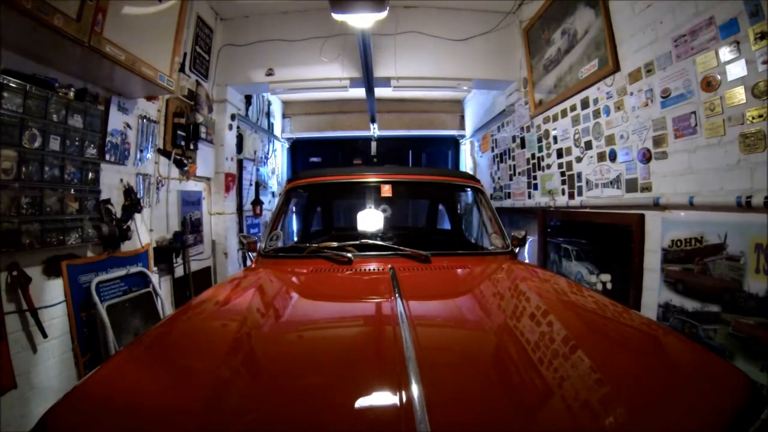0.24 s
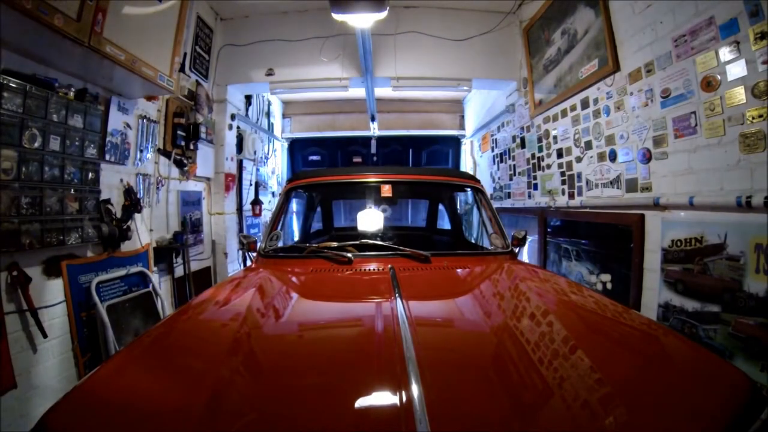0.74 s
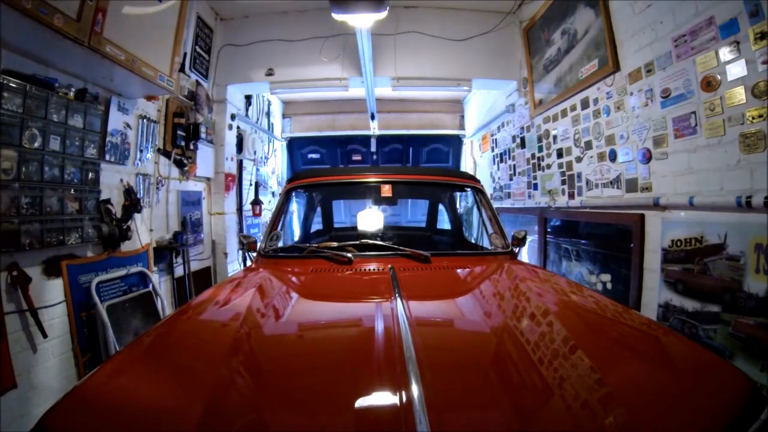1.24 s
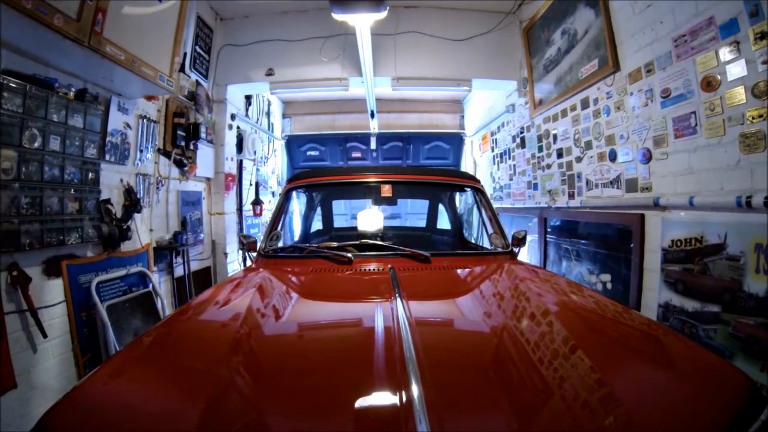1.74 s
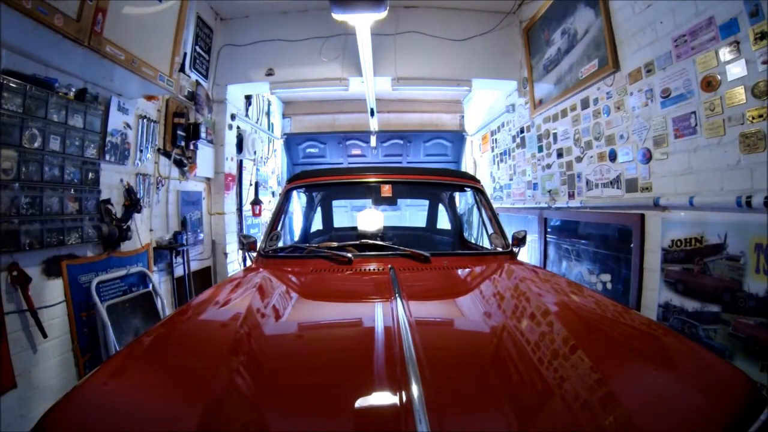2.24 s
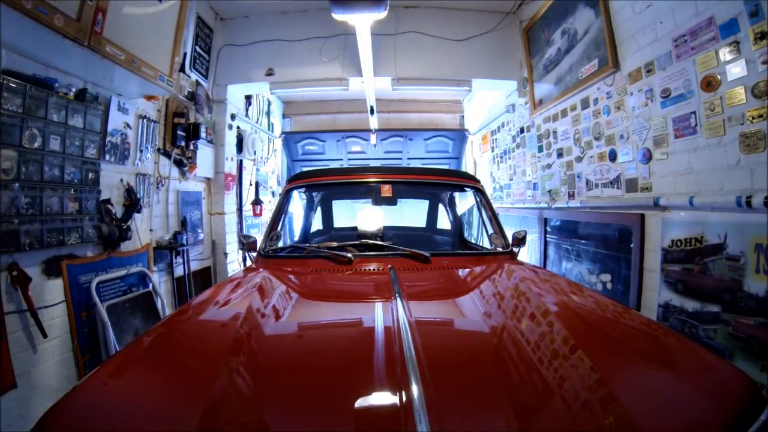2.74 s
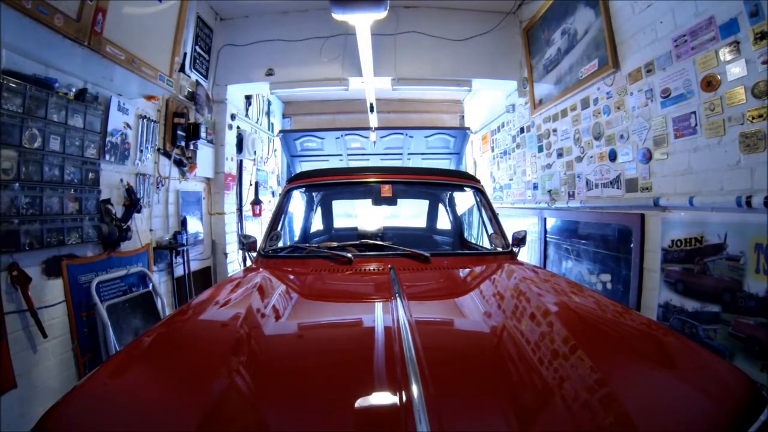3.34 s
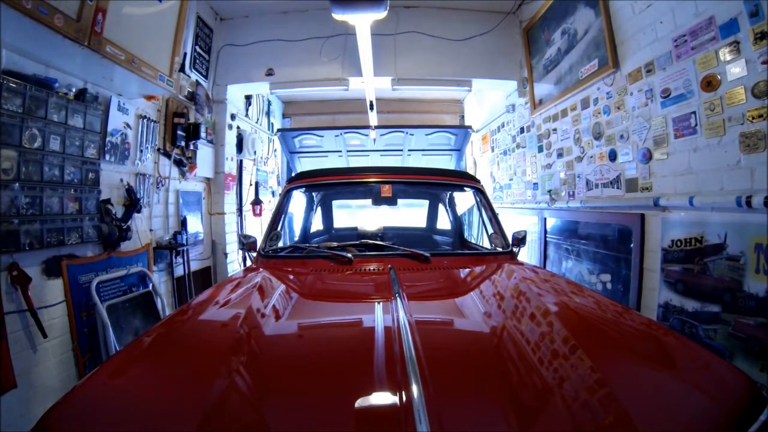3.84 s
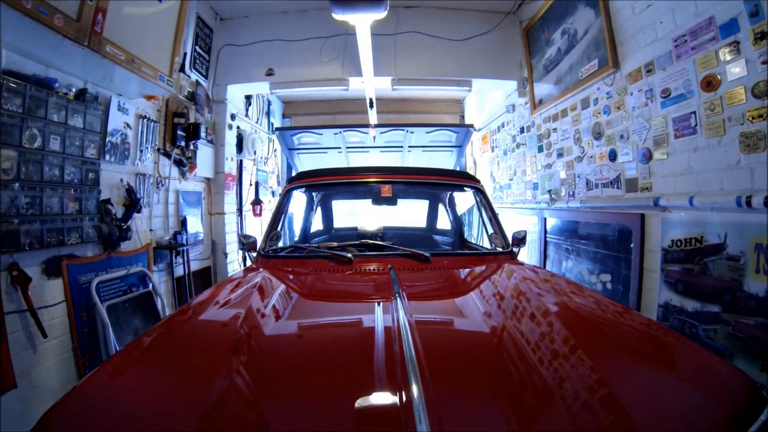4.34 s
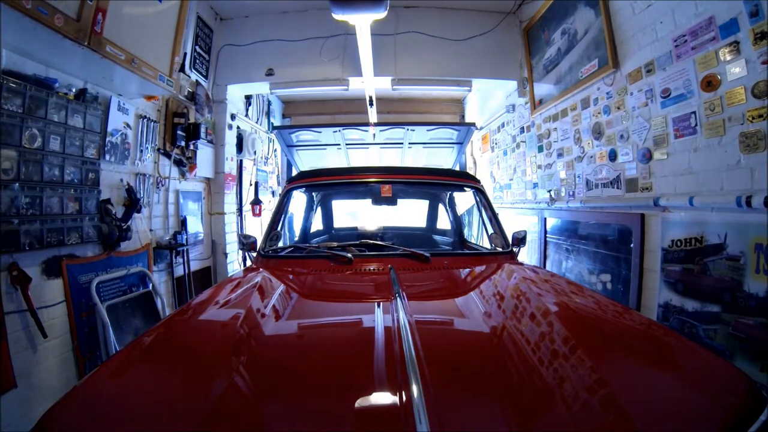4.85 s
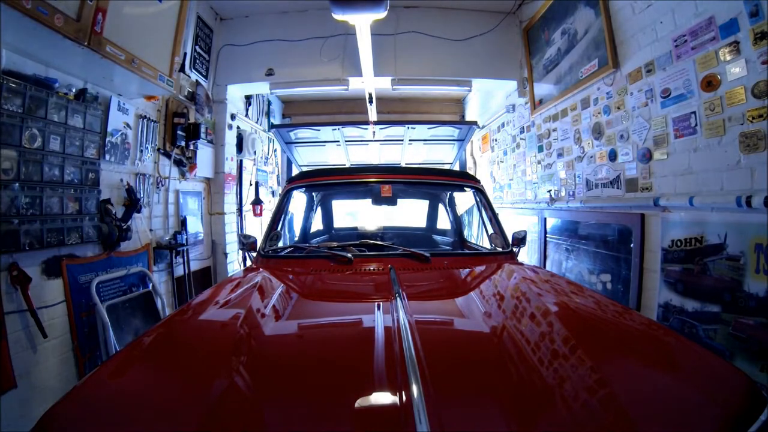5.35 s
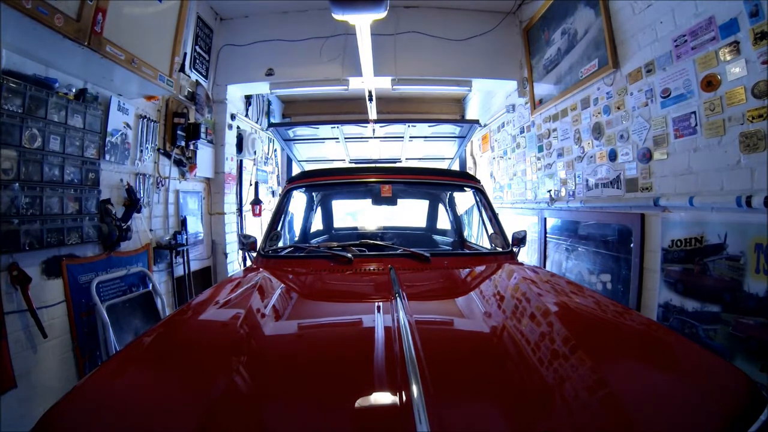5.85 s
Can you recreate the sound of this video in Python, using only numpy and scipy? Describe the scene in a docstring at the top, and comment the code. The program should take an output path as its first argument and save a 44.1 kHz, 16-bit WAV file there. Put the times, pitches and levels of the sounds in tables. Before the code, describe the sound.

An electric garage door opener runs with a steady low hum, a gear whine and a rattling drive. Early on, the steel door clicks and clanks several times as it pulls free, with a low rumble and a short rising squeak. The rollers then hiss and scrape lightly in their tracks, and the motor grows a little louder toward the end. It is heard from inside a narrow garage with a short echo.

```python
"""A narrow brick garage, where an electric opener lifts a steel up-and-over door.
The motor's core hums at twice the mains rate and its meshing gears whine. Dense small impacts excite
resonances: the drive rattles along its rail, and the rollers hiss and scrape in their tracks.
The door clicks and clanks as it leaves the frame, a dry pivot squeaks, and the panel rumbles and
booms in its low modes on the way up. Reflections from the close walls prolong the knocks and squeaks."""
import sys
import numpy as np
from scipy import signal
from scipy.fft import rfft, irfft
from scipy.io import wavfile
from scipy.ndimage import uniform_filter1d

SR = 44100
rng = np.random.default_rng(int(sys.argv[2]) if len(sys.argv) > 2 else 0)


def dump(signal):
    """Clip the signal to [-1, 1] and save it as 16-bit WAV at the path in sys.argv[1]."""
    limited = np.clip(np.atleast_2d(signal).T, -1, 1)
    pcm = np.round(limited * 32767).astype(np.int16)
    wavfile.write(sys.argv[1], SR, pcm)


N = 268128
HUM_HZ, SHAFT_HZ, BEATS_PER_TURN = 99.7, 19.8, 5

# faint steady hiss: frequency_hz, density_db
BACKGROUND_SPECTRUM = [(2000, -10), (3100, 7.5), (5200, -10.5), (5800, -9.5), (7300, -14.5), (8800, -9.5),
                       (11000, -17), (12200, -27), (13500, -32), (15000, -34)]
# reverberation time of the garage: frequency_hz, t60_s
GARAGE_DECAY = [(200, 0.34), (1000, 0.47), (3500, 0.38), (8000, 0.29), (15000, 0.22)]

# pace of the door as a level of roller hiss; it slows near 2.7 s, then runs freely: time_s, level_db
DOOR_PACE = [(0.0, -57.5), (0.78, -48.5), (1.0, -55.5), (1.5, -49.5), (1.62, -59.5), (1.88, -52),
             (2.2, -58), (2.47, -55), (2.72, -59.5), (2.98, -56.5), (3.3, -52), (3.7, -47), (4.85, -45.5),
             (5.35, -45), (6.08, -45)]
# hiss of the rollers: frequency_hz, density_db
ROLLER_SPECTRUM = [(710, -42), (1200, -23), (1350, -5), (1480, -10), (1830, 1.5), (2290, -7.5),
                   (2440, -4.5), (2620, -10), (2820, -10), (5210, -21), (5790, -25.5), (7470, -39.5),
                   (11000, -43), (13500, -60), (15000, -57)]
# resonances of the steel tracks: frequency_hz, gain_db
TRACK_MODES = [(2410, 0), (2770, -2), (2890, 0), (3120, -3), (3500, -3), (3790, -3), (3920, -4), (4135, -3),
               (4305, -6), (4540, -5), (4890, -7), (5105, -7)]
# a roller scrapes in its track: start_s, length_s, level_db
SCRAPES = [(0.274, 0.17, -36.5), (2.434, 0.11, -36.5), (2.895, 0.066, -40), (3.02, 0.13, -36.5),
           (3.623, 0.17, -39), (5.213, 0.067, -39), (5.604, .08, -33)]
# colour of a scrape: frequency_hz, density_db
SCRAPE_SPECTRUM = [(400, -28), (600, 10), (1300, 0.5), (2100, -1.5), (3000, -19), (5000, -34), (8000, -58)]
# spells in which the rollers set the panel whirring: time_s, level_db
WHIRR_LEVELS = [(0.0, -52), (0.7, -46), (1.0, -49), (1.7, -45.5), (2.2, -50.5), (2.44, -44.5), (2.54, -47),
                (2.62, -52), (2.95, -51.5), (3.13, -46.5), (3.5, -44.5), (3.8, -42.5), (4.2, -42),
                (4.36, -40), (4.6, -43.5), (5.1, -42.5), (5.5, -40.5), (6.08, -42)]
# panel resonances that whirr: frequency_hz, width_hz, gain_db
WHIRR_MODES = [(800, 9.4, -8.5), (841, 5.3, 5.5), (896.6, 7.3, 3), (937, 12, -3.5), (1006.6, 12, -2.5)]

# fine buzz of the gear teeth: frequency_hz, density_db
TOOTH_SPECTRUM = [(1400, -25), (1850, 2), (2300, -3), (2900, 0), (3800, -2.5), (5200, -10), (5900, -24),
                  (8000, -42), (11000, -60)]
# whine of the gears as they take the strain: time_s, level_db
WHINE_LEVELS = [(0.0, -57.5), (0.7, -42.5), (1.02, -55), (1.45, -48), (1.9, -50), (2.2, -63), (2.42, -48),
                (2.8, -55), (3.1, -51), (3.45, -43), (4.15, -51), (4.4, -48), (4.9, -44.5), (5.3, -46),
                (6.08, -44.5)]
# gear tones, relative to the whine's peak and its swing: pitch_hz, gain_db, swing_share
GEAR_TONES = [(355, -6, 0.3), (563, -5, 0.24), (764, -21, .1), (808, -5, 1.4), (851, -3, 0.72),
              (933, -4.5, 1.6), (971, -6, 1), (1020.4, -2, 1.25), (1760, -13.5, 1), (1864, -12, 1.07),
              (1980, -16, 0.79)]
# the drive's pull, as rattle added to what the pace gives: time_s, gain_db
DRIVE_PULL = [(0.0, -0.5), (0.8, -2.5), (1.35, -2), (2.0, -3), (2.7, -4), (3.3, -3.5), (3.8, -4), (4.4, -3),
              (4.9, -4.5), (5.35, -1), (6.08, -3.5)]
# resonances of the rail and motor housing: frequency_hz, width_hz, gain_db
RAIL_MODES = [(357.4, 5.1, 5), (392.5, 25.5, -2.5), (454.5, 30, -6.5), (530, 9.6, 1.5), (556.7, 13.3, -1.5),
              (617, 38, -4), (676, 40, -5.5), (779, 27, 0.5), (807, 24.5, -2), (872, 32, -0.5),
              (884.4, 13, 5), (979, 21.4, -0.5), (1028.6, 9.8, 0), (1083.5, 16.4, -2), (1232, 25, -8.5),
              (1316, 10.4, -6), (1614, 10, -8), (1753, 15, -9.5), (1883, 23, -13), (1982, 37, -16),
              (2142, 99, -16)]
# clatter of the drive links: frequency_hz, density_db
CLATTER_SPECTRUM = [(200, -35), (310, -56), (370, 5), (440, -4), (600, 6), (730, -1.5), (850, -5),
                    (1050, -3.5), (1170, -2.5), (1450, -5.5), (2100, -18), (2350, -26), (4000, -34)]
# the hum, rising with the load on the motor: time_s, fundamental_db, octave_db
HUM_LEVELS = [(0.05, -39, -54), (0.23, -41, -57), (0.26, -39, -48), (0.79, -31, -44), (1.08, -37, -53),
              (1.14, -34, -44), (1.18, -35, -55), (1.21, -37, -45), (1.34, -29, -45), (1.61, -36, -48),
              (2.57, -33, -49), (2.83, -34, -54), (2.95, -34, -48), (3.71, -31, -41), (4.27, -28, -43),
              (4.94, -30, -43), (5.2, -25, -44), (6.0, -27, -45)]
# drone of the housing on two harmonics of the hum: time_s, fourth_db, fifth_db
DRONE_LEVELS = [(0.0, -48.5, -54.5), (1.6, -46, -53.5), (2.3, -47.5, -70), (2.9, -49.5, -55),
                (3.25, -53, -50), (3.68, -44, -60), (3.8, -59, -43), (4.3, -52, -49), (4.9, -47, -53.5),
                (5.4, -48, -47.5), (6.08, -43, -46)]
# harmonics of the motor's buzz: harmonic_number, gain_db
BUZZ_HARMONICS = [(3, -34.5), (6, -14), (7, -7), (9, -6.5)]

# a dry pivot squeaks: start_s, pitch_hz, echo_level_db
SQUEAKS = [(.797, 2950, -58), (1.011, 3000, -58), (1.478, 2963, -42), (1.654, 2930, -57),
           (3.745, 9450, -75.5)]
# inharmonic partials of a squeak: pitch_ratio, gain_db
SQUEAK_PARTIALS = [(1, 0), (1.115, -5), (1.41, -11)]
# knocks of the linkage and rollers: start_s, clang_db, ring_db, clack_db, tick_db, cutoff_hz
KNOCKS = [(.732, -33, -51, -46.5, -46, 15000), (0.792, -37, -46, -43, -68, 8000),
          (.831, -29, -50, -34, -40, 13300), (1.064, -38, -44, -51, -72, 8000),
          (1.084, -24, -19, -32.5, -47, 16000), (1.112, -33, -31, -42, -64, 12000),
          (1.137, -44, -20, -55, -75, 1210), (1.273, -49, -60, -61, -59, 15000),
          (1.400, -32, -46, -48, -51.5, 16000), (1.479, -32.5, -39, -42, -51, 8500),
          (1.617, -42, -47, -59, -57.5, 15000), (1.653, -39, -46, -49, -72, 8000),
          (1.899, -38, -48, -52.5, -59.5, 10100), (2.897, -40, -47, -57, -80, 4000),
          (3.033, -40, -42, -55, -80, 4000), (3.624, -34.5, -46, -54, -78, 4000)]
# ringing modes of the door: frequency_hz, gain_db, t60_s
DOOR_MODES = [(533, -9, .25), (790, -11, .16), (945, -5, .16), (980, -3, .13), (1003, 2, .15),
              (1028, -3, .15), (1130, -11, .14), (1265, -10, .17), (1400, -13, .14), (1545, -9, .17),
              (1620, -16, .33), (1730, -13.5, .28), (1875, -16, .18), (2058, -13.5, .42)]
# ringing modes of the steel linkage: frequency_hz, gain_db, t60_s
LINKAGE_MODES = [(2842, -3, .25), (3138, -5, .29), (3214, 0, .2), (3375, -3, .23), (3784, -6, .27),
                 (4177, -8, .2), (5448, -12, .12)]
# the panel's clang in a knock: frequency_hz, density_db
CLANG_SPECTRUM = [(150, -3), (450, -17.5), (750, -4.5), (1000, -4.5), (1400, -11), (2100, -16), (3000, -28)]
# the metal clack in a knock: frequency_hz, density_db
CLACK_SPECTRUM = [(1200, -45), (2050, 6.5), (2450, 3.5), (3250, 8), (3650, 3.5), (4200, -1), (5300, -6),
                  (6600, -43), (9000, -38)]
# the bright tick in a knock: frequency_hz, density_db
TICK_SPECTRUM = [(4000, 9.5), (6000, 5), (7500, -3), (8700, 2), (11400, -2), (12300, -4), (14200, -7),
                 (15500, -14)]

# sway of the panel, greatest as it breaks free of the frame: time_s, level_db
SWAY_LEVELS = [(0.0, -29), (0.55, -26.5), (1.15, -22), (1.32, -15.5), (1.7, -29.5), (1.95, -30.5),
               (2.4, -35.5), (2.7, -38), (3.15, -33), (3.5, -35), (4.2, -32), (5.0, -35.5), (6.08, -37.5)]
# slow flexing of the panel: frequency_hz, density_db
FLEX_SPECTRUM = [(8, -27), (13, 14.5), (24, 6), (37, 5.5), (52, -0.5), (70, -2.5), (90, -18.5),
                 (125, -11.5), (170, -38)]
# drumming of the panel: frequency_hz, density_db
DRUMMING_SPECTRUM = [(80, 5), (125, 3), (170, 0), (225, -10), (270, -4.5), (330, -3), (500, -6.5)]
# jolts of the panel: start_s, boom_db, drumming_db
BUMPS = [(0.294, -24, -35), (0.879, -17, -35), (1.088, -37, -31.5), (1.255, -32, -49), (1.411, -20, -44),
         (1.892, -26.5, -33), (2.058, -24.5, -41), (3.606, -15.5, -58), (4.112, -22.5, -61),
         (4.164, -20.5, -58)]
# lowest modes of the panel: frequency_hz, gain_db, t60_s
BOOM_MODES = [(34, 1, 0.51), (65.6, 0, 0.13)]


def from_db(db):
    """Amplitude ratio of a level in decibels."""
    return 10 ** (np.asarray(db) / 20)


def unit_power(x):
    """Normalisation to an RMS of one."""
    return x / np.sqrt(np.mean(x ** 2) + 1e-20)


def in_time(rows):
    """Linear interpolation in time: one curve per column."""
    times, *columns = np.transpose(rows)
    return [np.interp(np.arange(N) / SR, times, column) for column in columns]


def at_hz(points, hz):
    """Interpolation on a logarithmic frequency axis."""
    frequencies, values = np.transpose(points)
    return np.interp(np.log(np.maximum(hz, 1)), np.log(frequencies), values)


def coloured(x, spectrum):
    """Spectral shaping to unit power, falling 12 dB per octave beyond the table's ends."""
    hz = np.maximum(np.fft.rfftfreq(len(x), 1 / SR), 1)
    skirts = np.minimum(hz / spectrum[0][0], 1) ** 2 * np.minimum(spectrum[-1][0] / hz, 1) ** 2
    return unit_power(irfft(rfft(x) * from_db(at_hz(spectrum, hz)) * skirts, len(x)))


def noise(spectrum):
    """Gaussian noise with a given spectral shape."""
    return coloured(rng.standard_normal(N), spectrum)


def drift(rate_hz):
    """Random fluctuation: low-passed noise of unit power."""
    hz = np.fft.rfftfreq(N, 1 / SR)
    return unit_power(irfft(rfft(rng.standard_normal(N)) / (1 + (hz / rate_hz) ** 2), N))


def tone(hz):
    """A sinusoid of unit power whose phase is the integral of its frequency."""
    return np.sqrt(2) * np.sin(2 * np.pi * (np.cumsum(hz) / SR + rng.random()))


def resonance(x, hz, width_hz):
    """Forced response of a damped oscillator with a peak gain of one."""
    r = np.exp(-np.pi * width_hz / SR)
    feedback = [1, -2 * r * np.cos(2 * np.pi * hz / SR), r * r]
    return signal.lfilter(np.array([1, 0, -1]) * (1 - r * r) / 2, feedback, x)


def struck(modes, t):
    """Free vibration: modes decay exponentially, with new strengths and phases at each blow."""
    return sum(from_db(db + rng.normal(0, 1) - 60 * t / t60) * np.sin(2 * np.pi * (hz * t + rng.random()))
               for hz, db, t60 in modes)


def onset(t, rise_s):
    """Exponential approach to full amplitude."""
    return 1 - np.exp(-t / rise_s)


def contacts(per_s, spread_db, throb, throb_hz):
    """Shot noise: tiny random impacts, modulated by the machine that shakes them."""
    sizes = from_db(spread_db * np.minimum(rng.exponential(1, N), 4)) * rng.standard_normal(N)
    shake = 1 + throb * np.sin(2 * np.pi * throb_hz * np.arange(N) / SR)
    return sizes * shake * (rng.random(N) < per_s / SR)


def add(out, start_s, sound):
    """Superposition of a sound from its start time."""
    at = round(start_s * SR)
    out[at:at + len(sound)] += sound[:N - at]


def reflected(x, t60_s):
    """Interference: dense echoes from close walls give a sound fine, stationary spectral peaks."""
    t = np.arange(SR // 4) / SR
    return signal.fftconvolve(x, rng.standard_normal(len(t)) * from_db(-60 * t / t60_s))[:N]


def garage_response(spectrum, build_s=0.0008, direct=9):
    """Impulse response: a direct snap at 2 ms amid reflections that build, then die soonest in the treble."""
    t = np.arange(SR // 2) / SR
    arrivals = rng.standard_normal(len(t))
    arrivals[round(0.002 * SR)] += direct
    bins, hz = rfft(coloured(arrivals, spectrum)), np.fft.rfftfreq(len(t), 1 / SR)
    tail = np.zeros(len(t))
    for low_hz in 44 * 2. ** np.arange(10):
        octave = irfft(bins * (hz >= low_hz) * (hz < 2 * low_hz), len(t))
        tail += octave * from_db(-60 * t / at_hz(GARAGE_DECAY, low_hz * np.sqrt(2)))
    return tail * onset(t, build_s)


def background():
    """Stationary noise: a faint, even hiss."""
    return from_db(-63.5) * noise(BACKGROUND_SPECTRUM)


def rollers():
    """Roughness excitation: fine contacts on steel ring the tracks and fill the garage with uneven hiss."""
    grains = contacts(per_s=16000, spread_db=0, throb=0.034, throb_hz=SHAFT_HZ)
    ringing = sum(from_db(db) * resonance(grains, hz, width_hz=12) for hz, db in TRACK_MODES)
    ringing = coloured(ringing, [(2300, 0), (5300, 0), (6200, -12)])
    far_side = contacts(per_s=16000, spread_db=2, throb=0.062, throb_hz=HUM_HZ)
    hiss = coloured(reflected(grains, t60_s=0.3) + reflected(far_side, t60_s=0.3), ROLLER_SPECTRUM)
    return from_db(0.5 * drift(38)) * (from_db(0.4) * hiss + from_db(-11.5) * ringing)


def scrapes():
    """Sliding friction: a roller rubs its track in strokes that come on quickly and ease off."""
    t = np.arange(N) / SR
    stages, gains = np.array([0, 0.2, 0.6, 1.5]), [0.0015, 0.7, 0.47, 0.011]
    strokes = sum(from_db(db) * np.interp(t, start_s + length_s * stages, gains)
                  for start_s, length_s, db in SCRAPES)
    grains = contacts(per_s=6400, spread_db=3.5, throb=0.046, throb_hz=SHAFT_HZ)
    return strokes * coloured(grains, SCRAPE_SPECTRUM)


def whirr():
    """Selective resonance: broadband rolling contacts feed a few narrow modes of the panel."""
    whirr_db, = in_time(WHIRR_LEVELS)
    grains = contacts(per_s=6000, spread_db=0.5, throb=0.1, throb_hz=SHAFT_HZ)
    ringing = sum(from_db(db) * resonance(grains, hz, width) for hz, width, db in WHIRR_MODES)
    running_rms = np.sqrt(uniform_filter1d(ringing ** 2, size=SR // 6) + 1e-20)
    return from_db(whirr_db) * ringing / running_rms


def tooth_buzz():
    """Periodic impacts: teeth tick on each beat of the hum, repeating every shaft turn; echoes blur them."""
    beat = np.floor(np.cumsum(HUM_HZ + 0.08 * drift(3.06)) / SR).astype(int)
    strengths = 1 + rng.standard_normal(BEATS_PER_TURN)
    ticks = np.diff(beat, prepend=0) * strengths[beat % BEATS_PER_TURN]
    return coloured(reflected(ticks, t60_s=0.2), TOOTH_SPECTRUM)


def gears(wobble_hz=2.394, flutter_db=2.5):
    """Gear meshing: tones unsteady in pitch and strength, the upper ones growing most with the strain."""
    whine_db, = in_time(WHINE_LEVELS)
    peak_db = whine_db.max()
    out = np.zeros(N)
    for hz, db, share in GEAR_TONES:
        level_db = peak_db + db + share * (whine_db - peak_db) + flutter_db * drift(5.4)
        out += from_db(level_db) * tone(hz + wobble_hz * drift(8.73))
    return out


def drive():
    """Impact excitation: links clatter over the sprocket and ring the modes of the rail."""
    links = contacts(per_s=9000, spread_db=1.05, throb=0.39, throb_hz=HUM_HZ)
    rail = sum((-1) ** k * from_db(db) * resonance(links, hz, width)
               for k, (hz, width, db) in enumerate(RAIL_MODES))
    clatter = coloured(contacts(per_s=9000, spread_db=1.9, throb=0.11, throb_hz=HUM_HZ), CLATTER_SPECTRUM)
    return from_db(-1) * unit_power(rail) + from_db(-6.5 + 0.5 * drift(24)) * clatter


def motor():
    """Forced vibration: the iron core hums at twice the mains rate; its harmonics drone and buzz."""
    hum_db, octave_db = in_time(HUM_LEVELS)
    whine_db, = in_time(WHINE_LEVELS)
    hz = HUM_HZ + 0.096 * drift(1.5)
    buzz = sum(from_db(db + 0.35 * k ** 0.64 * drift(3.3)) * tone(k * hz) for k, db in BUZZ_HARMONICS)
    buzz_db = -44 + 0.84 * (whine_db - whine_db.max())  # grows with the strain on the gears
    fourth, fifth = (from_db(db + 1.7 * drift(2)) for db in in_time(DRONE_LEVELS))
    drone = fourth * tone(4 * hz) + fifth * tone(5 * hz)
    waver_db = 1.04 + 0.12 * (hum_db.max() - hum_db)  # the octave wavers more under light load
    hum = from_db(hum_db) * tone(hz) + from_db(octave_db + waver_db * drift(5)) * tone(2 * hz)
    return hum + from_db(buzz_db) * buzz + drone


def squeaks(glide=0.016, roughness=0.022, decay_s=0.0046):
    """Frictional slip: a dry pivot gives a brief, rough, rising note that lingers as reverberation."""
    out, t = np.zeros(N), np.arange(N) / SR
    for start_s, hz, db in SQUEAKS:
        pitch_hz = hz * (1 + glide * np.minimum(t / decay_s, 2) + roughness * drift(300))
        note = sum(from_db(gain_db) * tone(ratio * pitch_hz) for ratio, gain_db in SQUEAK_PARTIALS)
        note *= onset(t, rise_s=0.0014) * np.exp(-t / decay_s)
        echo = reflected(note, t60_s=0.29)
        add(out, start_s, from_db(db) * (4.2 * note + echo / np.std(echo[:SR // 20])))
    return out


def knocks():
    """Transient response: slack snaps out of linkage and rollers with a tick, clack, clang and ring."""
    out, t = np.zeros(N), np.arange(SR // 2) / SR
    for start_s, clang_db, ring_db, clack_db, tick_db, cutoff_hz in KNOCKS:
        ring = struck(DOOR_MODES, t) * onset(t, rise_s=0.018)
        ring *= 1 + 0.45 * drift(70)[:len(t)]  # loose fittings shake the ring
        clang = garage_response(CLANG_SPECTRUM, build_s=0.0033, direct=0)
        clack = from_db(-2.7) * garage_response(CLACK_SPECTRUM)
        clack += from_db(-6.5) * struck(LINKAGE_MODES, t) * onset(t, rise_s=0.0026)
        tick = garage_response(TICK_SPECTRUM)
        knock = (from_db(clang_db) * clang + from_db(ring_db) * ring
                 + from_db(clack_db) * clack + from_db(tick_db) * tick)
        lowpass = signal.butter(4, cutoff_hz, fs=SR, output="sos")  # softer contacts are duller
        add(out, start_s, signal.sosfilt(lowpass, knock))
    return out


def panel(heave_top_hz=31, rumble_limit_db=-23.5, drumming_t60_s=0.4):
    """Plate vibration: the steel sheet heaves, rumbles and drums; bumps excite its lowest modes."""
    sway_db, = in_time(SWAY_LEVELS)
    flex = noise(FLEX_SPECTRUM)
    flex /= np.sqrt(uniform_filter1d(flex ** 2, size=SR // 7))  # evens out the sway
    heave = signal.sosfiltfilt(signal.butter(2, heave_top_hz, fs=SR, output="sos"), flex)
    rumble = flex - heave
    out = from_db(sway_db) * heave + from_db(np.minimum(sway_db, rumble_limit_db)) * rumble
    drumming_gain = from_db(-43 + 0.063 * (sway_db - sway_db.max()))
    t = np.arange(SR // 2) / SR
    rise = onset(t, rise_s=0.0087)
    boom = sum(from_db(db - 60 * t / t60) * np.sin(2 * np.pi * hz * t) for hz, db, t60 in BOOM_MODES)
    for start_s, boom_db, drumming_db in BUMPS:
        add(out, start_s, from_db(boom_db) * boom * rise)
        add(drumming_gain, start_s, from_db(drumming_db - 60 * t / drumming_t60_s) * rise)
    return out + drumming_gain * noise(DRUMMING_SPECTRUM)


def scene():
    """Superposition: roller hiss and tooth buzz follow the door's pace, the rattle its pace and pull."""
    pace_db, = in_time(DOOR_PACE)
    pull_db, = in_time(DRIVE_PULL)
    t = np.arange(N) / SR
    rattle_db = -31 + 0.53 * (pace_db + 43) + pull_db  # takes about half of the hiss's swing
    # each beat of the hum jerks the drive and rollers
    jerks = 1 + 0.045 * sum(np.cos(2 * np.pi * k * HUM_HZ * t) for k in range(1, 4))
    buzz = from_db(pace_db - 4.5) * tooth_buzz()
    running = motor() + buzz + gears() + whirr()
    running += jerks * (from_db(rattle_db) * drive() + from_db(pace_db - 0.2) * rollers())
    door = panel() + knocks() + scrapes() + squeaks()
    return (running + door + background())[None]


def record(dry):
    """Band limiting: a steep low-pass filter removes the treble above 15.2 kHz."""
    return signal.sosfilt(signal.ellip(10, 0.1, 80, 15200, fs=SR, output="sos"), dry)


dry = scene()
out = record(dry)
dump(out)
```